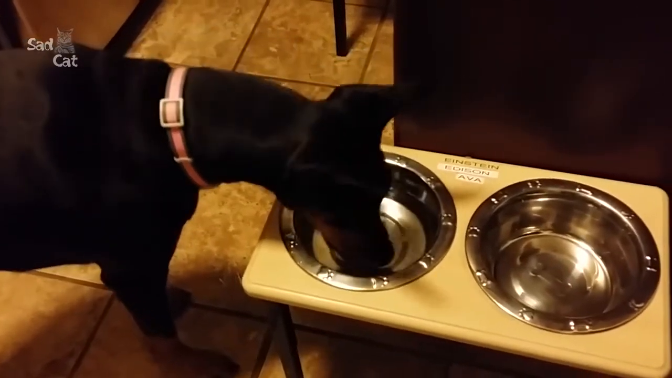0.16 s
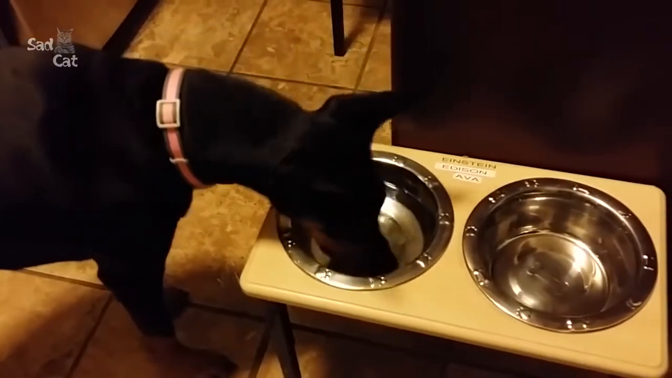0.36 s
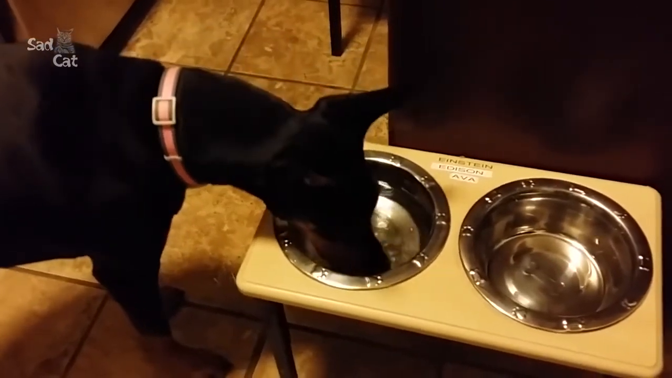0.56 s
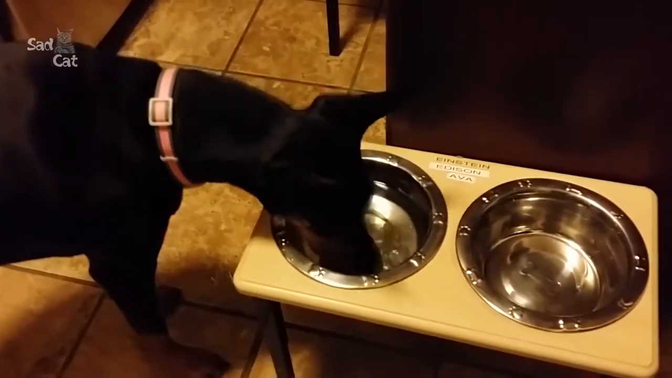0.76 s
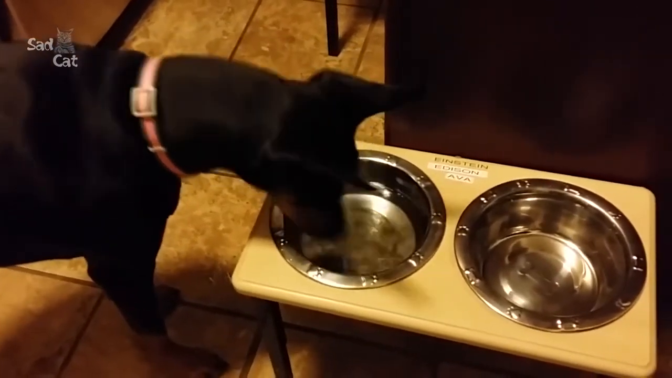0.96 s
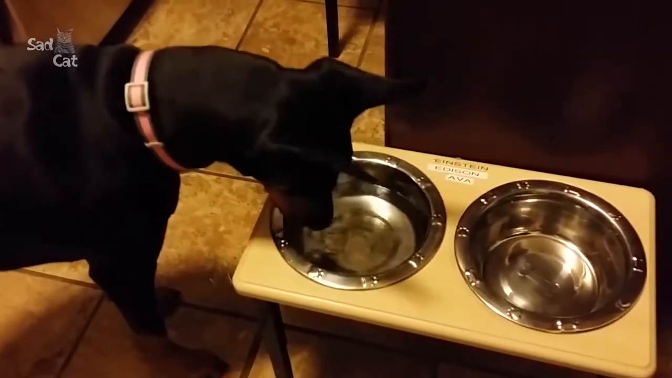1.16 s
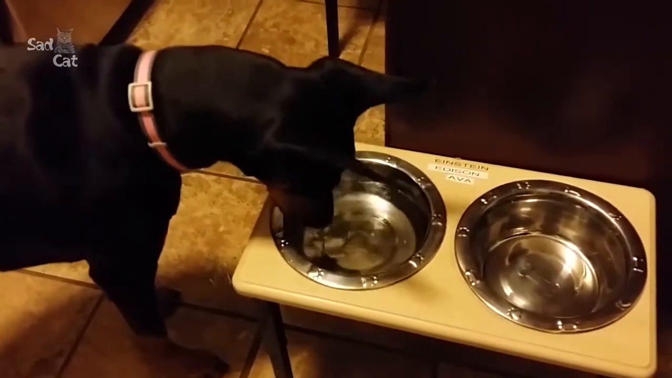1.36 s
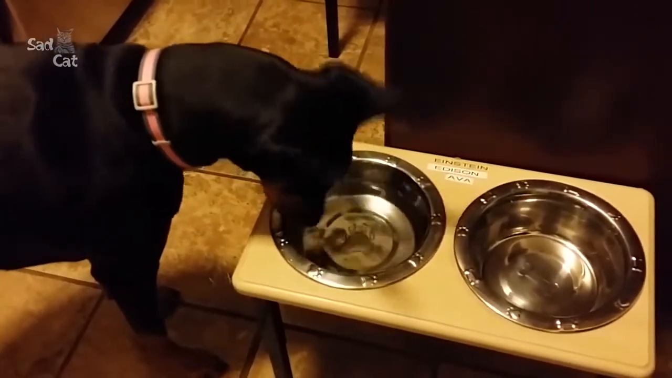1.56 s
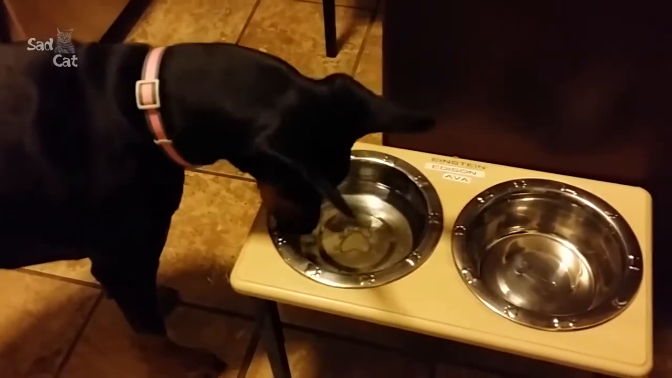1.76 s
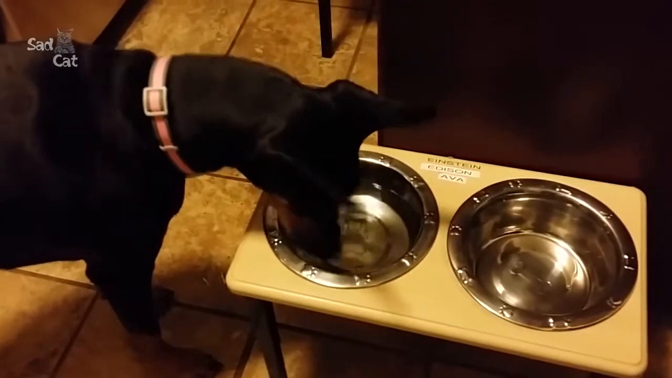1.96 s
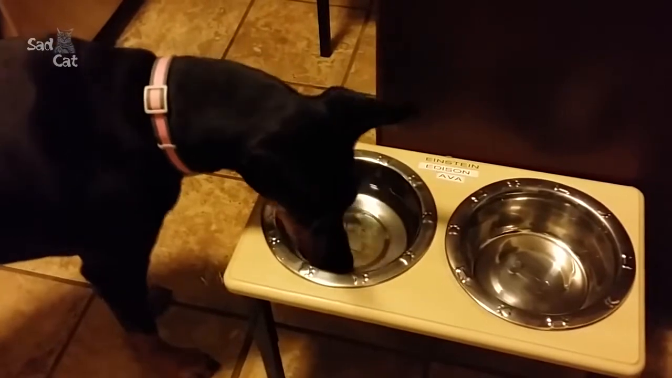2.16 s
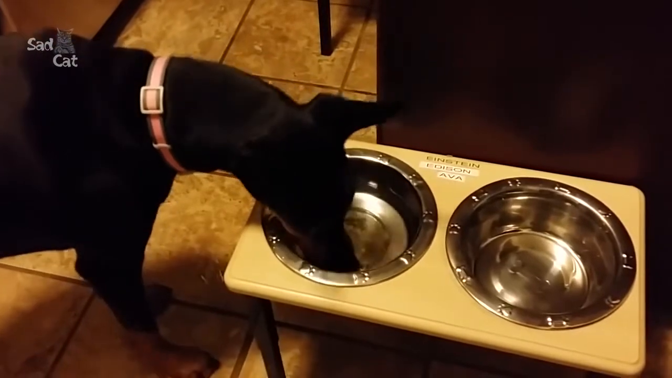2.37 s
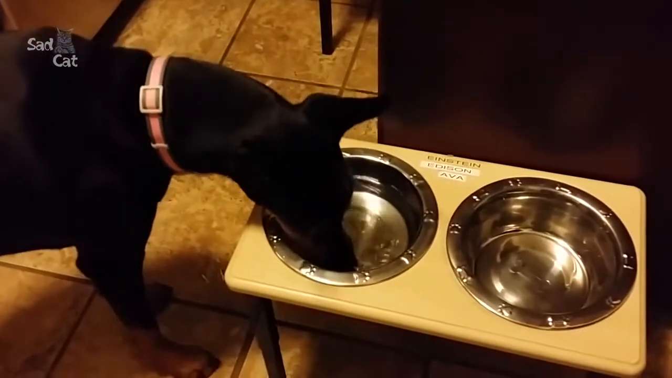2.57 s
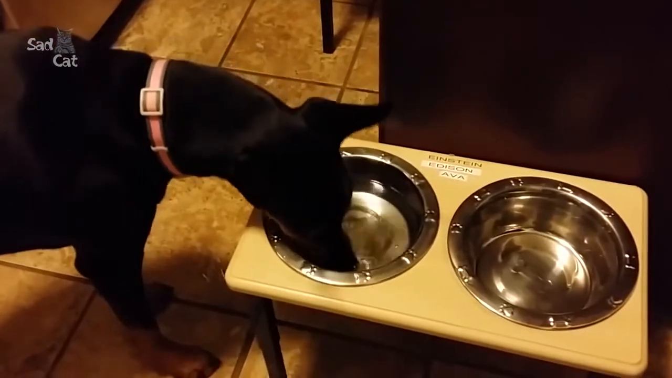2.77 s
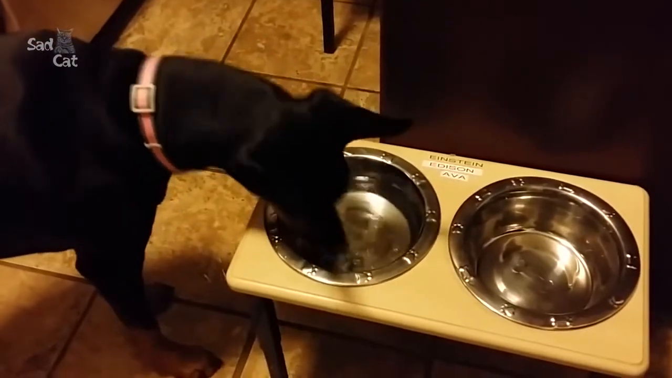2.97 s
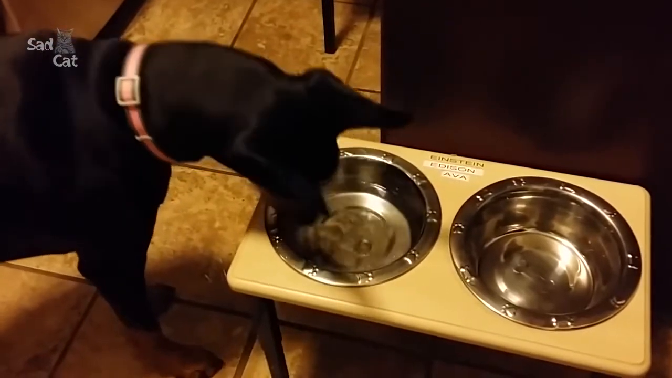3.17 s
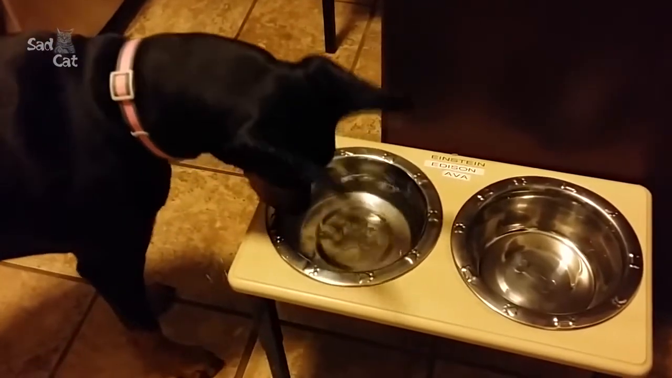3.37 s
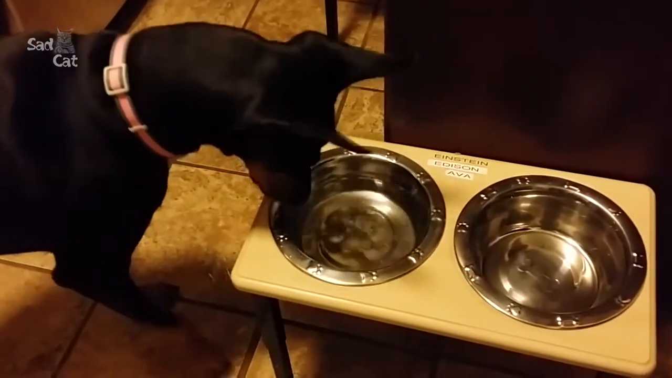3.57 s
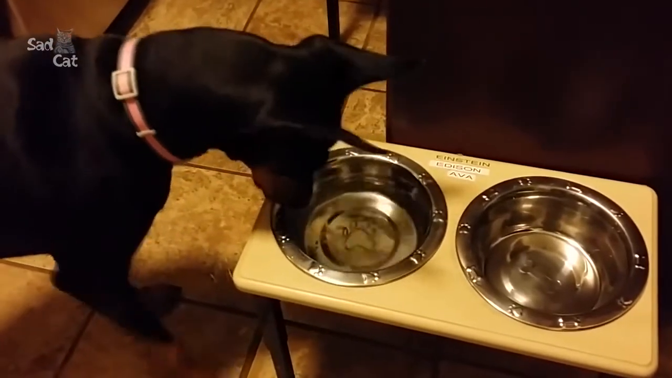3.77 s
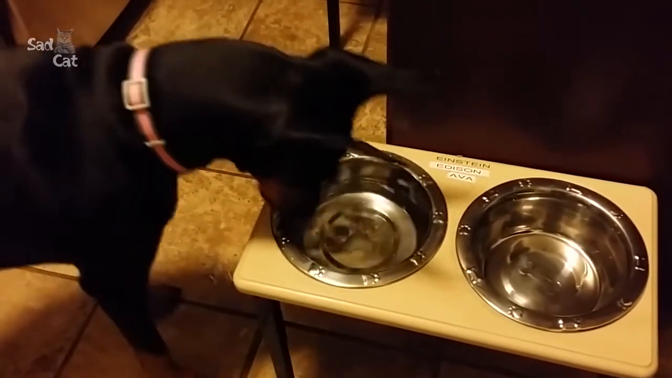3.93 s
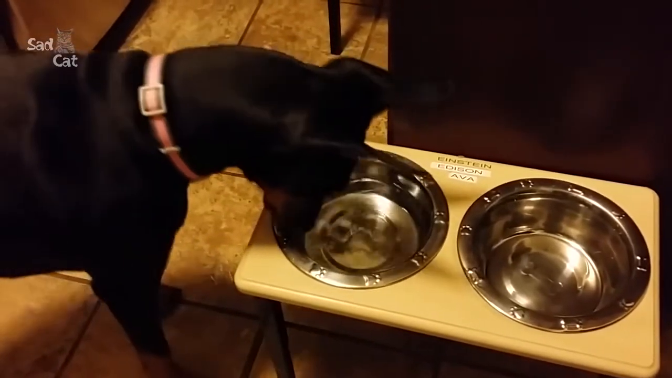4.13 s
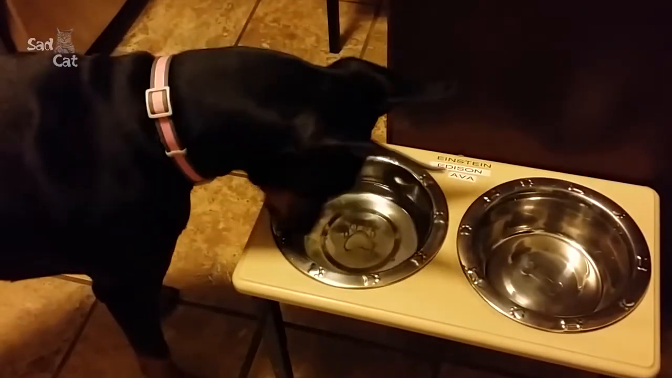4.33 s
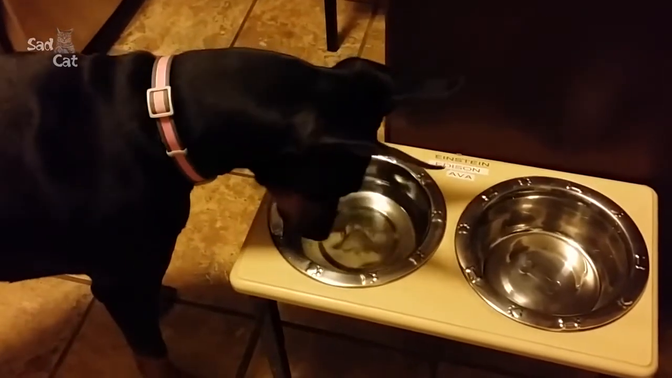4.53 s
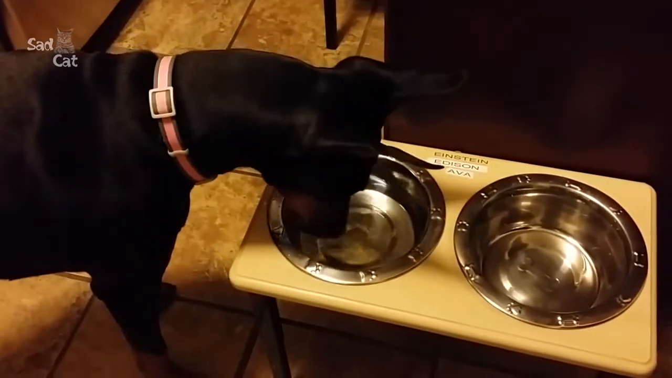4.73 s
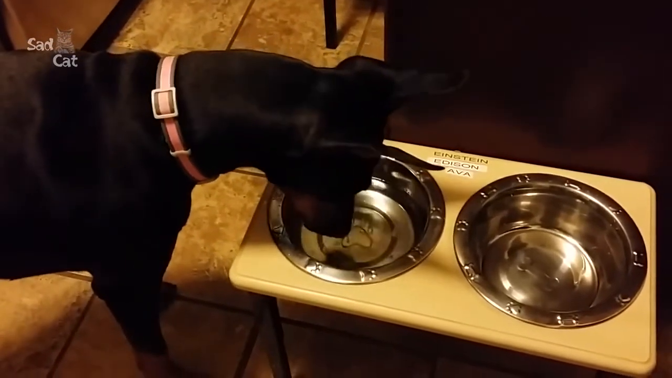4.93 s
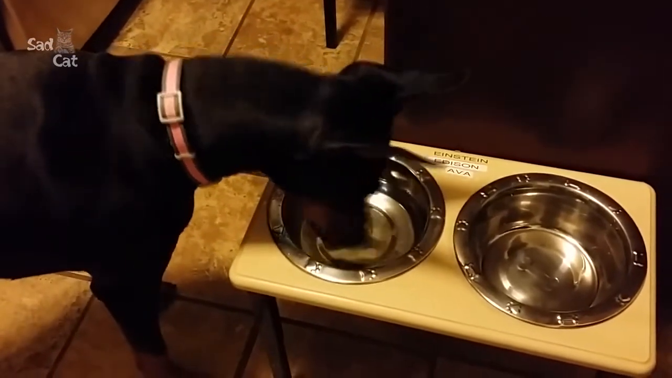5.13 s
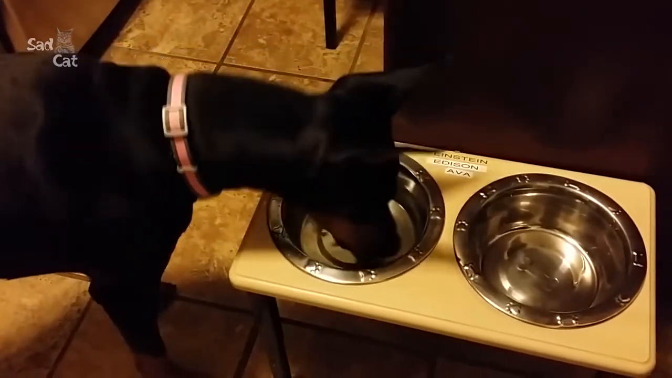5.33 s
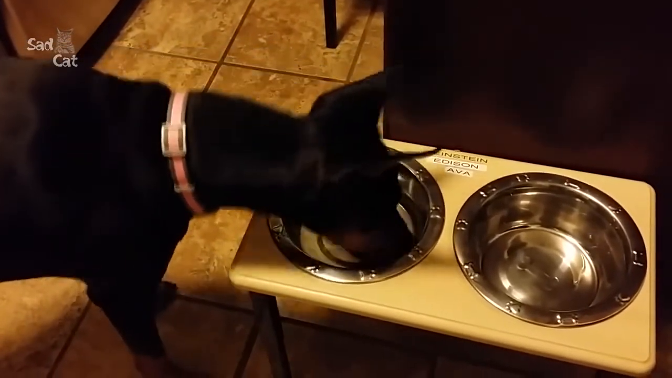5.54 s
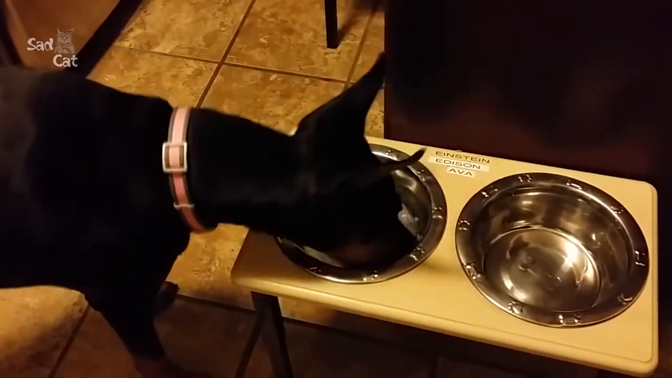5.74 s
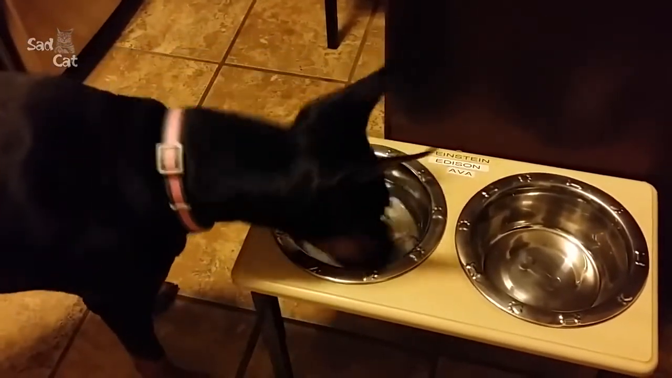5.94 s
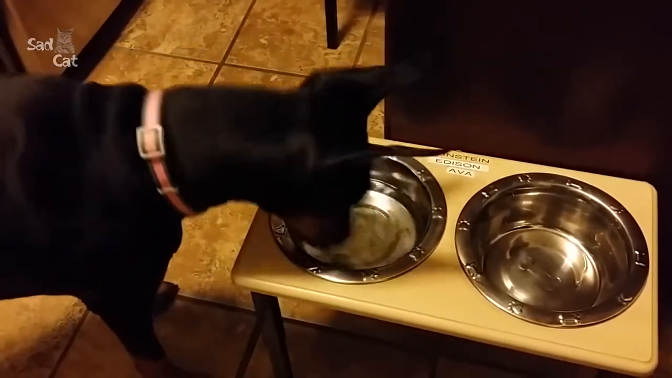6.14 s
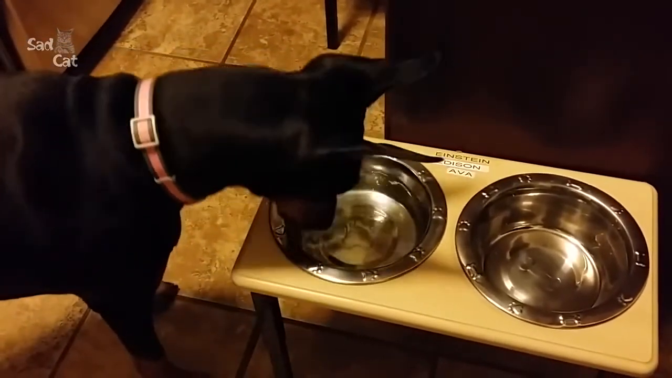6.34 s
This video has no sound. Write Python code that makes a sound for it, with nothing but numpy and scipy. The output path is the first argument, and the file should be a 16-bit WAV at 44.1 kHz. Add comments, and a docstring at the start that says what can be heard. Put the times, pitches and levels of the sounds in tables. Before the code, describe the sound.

A dog laps water from a metal bowl in wet, gulping bouts with pauses between, over faint hum and hiss.

```python
"""A dog laps water from a steel bowl on a stand in a tiled kitchen, over a faint mains hum and hiss.
A first bout begins at once: slaps are pressure pulses, gulps are shrinking cavities that climb in pitch,
bubbles are decaying sines, smacks are bursts of band noise and the stirred water is a swarm of bubbles.
A faint whine swells and sinks up to the second bout, whose end is followed by a soft swish of noise; after
a longer pause comes a short third bout. Bowl modes and a decaying noise tail return the water sounds."""
import sys
import numpy as np
from scipy import signal
from scipy.fft import rfft, irfft, next_fast_len
from scipy.io import wavfile

SR = 44100
rng = np.random.default_rng(int(sys.argv[2]) if len(sys.argv) > 2 else 0)


def waveform_to_disk(signal):
    """Save audio, clipped to [-1, 1], as 16-bit WAV at the path in sys.argv[1]."""
    frames = np.transpose(np.atleast_2d(signal))
    scaled = np.clip(frames, -1, 1) * 32767
    samples = np.round(scaled).astype(np.int16)
    wavfile.write(sys.argv[1], SR, samples)


N = 286628

# In every table the room level is relative to the direct sound.
# Tongue striking the water: (time [s], pulse level [dB], room level [dB])
TONGUE_SLAPS = [(0.1745, -40, -11.5), (0.228, -49, 6), (.451, -47.5, 12), (.529, -42, 3.5),
                (.589, -38, -0.5), (0.686, -39.5, 13), (.710, -34.5, 9), (.764, -26.5, -2.5),
                (2.362, -42, 1.5), (2.523, -37, 1.5), (2.579, -39.5, -2), (2.704, -39, -4), (2.781, -42, 8),
                (2.929, -40.5, 8.5), (3.018, -57, 11), (3.096, -35.5, 8), (5.637, -48.5, 14),
                (5.805, -43.5, 6.5), (5.882, -27.5, -9), (5.942, -38.5, 9.5)]
# Air cavities behind the tongue:
# (time [s], length [ms], first pitch [Hz], last pitch [Hz], level before shaking [dB])
CAVITIES = [(.588, 28.7, 976, 1423, -31), (.711, 25, 630, 650, -40.5), (.766, 34, 635, 734, -36.5),
            (.808, 44, 636, 682, -43), (0.901, 48, 489, 1590, -43.5), (2.294, 75, 546, 692, -53),
            (2.35, 43, 823, 887, -51.5), (2.586, 40.6, 613, 1590, -39), (2.690, 23, 580, 605, -46),
            (2.779, 40, 521, 630, -44), (3.024, 31.5, 510, 582, -34), (3.043, 34, 560.4, 1325, -30),
            (5.882, 39, 677, 807, -36.5)]
# Larger air bubbles, from plops to pings: (time [s], starting pitch [Hz], level [dB], room level [dB])
AIR_BUBBLES = [(.227, 8760, -29.5, -4.5), (.288, 795, -51, 13.5), (0.4386, 1270, -40.5, -8),
               (0.4615, 1290, -36, -6), (.53, 1260, -32.5, -6.5), (.685, 526, -33.5, 10.5),
               (0.71, 1420, -26, -1), (0.7123, 8370, -27.5, 1), (.842, 1380, -32.5, -3),
               (0.892, 1555, -37, 2.5), (.9543, 7890, -36, 20), (1.0348, 7080, -27.5, 4),
               (1.0892, 5170, -16, -12.5), (2.087, 8800, -38, -4), (2.451, 1560, -38, 1),
               (2.672, 985, -36, 4), (2.7203, 6300, -27, 3.5), (2.7217, 8650, -20, -7.5),
               (2.744, 1600, -37.5, 5.5), (2.785, 8500, -36, -3), (2.83, 1177, -33.5, 2.5),
               (2.858, 1260, -33.5, -4.5), (2.933, 8670, -28, 4), (2.94, 1530, -32, 2),
               (3.0164, 5700, -34.5, 10.5), (3.018, 1200, -28.5, -5), (3.0682, 5980, -23, 7),
               (4.842, 8140, -48, -11), (5.806, 1400, -37, -11), (5.823, 1560, -37, 1),
               (5.863, 1190, -41, 5), (5.944, 984, -32, 3), (5.968, 1020, -35, 2), (6.0241, 4080, -38, 5),
               (6.055, 1240, -36.5, 3), (6.0888, 9000, -36.5, -3), (6.125, 6540, -32, 8),
               (6.1245, 8770, -21, 4.5)]
# Wet smacks of lips and tongue:
# (time [s], band centre [Hz], band width [octaves], decay [ms], rms level before the decay [dB])
WET_SMACKS = [(0.1929, 7160, 1.06, 0.29, -31.5), (0.29, 6440, 1.7, 3.2, -47.5),
              (.462, 3580, .75, 0.97, -41.5), (.612, 2060, 0.24, 37, -59), (0.7101, 3500, 2.2, 1.44, -29.5),
              (.892, 2800, 0.32, 1.4, -42.5), (0.9547, 8100, .25, 1.9, -34), (2.342, 1960, 0.11, 12, -54),
              (2.344, 3450, 0.1, 4, -49.5), (2.352, 7240, 0.43, 28, -57), (2.357, 616, 0.37, 26, -51),
              (2.455, 8300, 0.46, 21, -53), (2.4691, 3180, 0.47, 5.3, -34.5), (2.471, 1500, 0.11, 42, -50),
              (2.825, 3170, 0.088, 12, -45), (2.862, 2650, 0.056, 24, -44), (3.0682, 6720, .19, 3.7, -33.5),
              (3.182, 7160, 4.3, 2.7, -44.5), (5.633, 1990, .27, 16.6, -50), (5.637, 6000, .8, 42, -60),
              (6.122, 1800, 0.37, 22, -46), (6.123, 8300, 0.27, 13, -39)]
# Bouts of lapping: (start [s], end [s], stirring level at start [dB], stirring level at end [dB])
LAPPING_BOUTS = [(0.148, 1.004, -68, -55), (2.395, 3.107, -56, -54), (5.769, 6.132, -64.5, -58)]
# Bubble spectrum of the sloshing water: (frequency [Hz], level [dB])
SLOSH_SPECTRUM = [(90, -4), (200, -7.5), (300, -3), (650, -10), (1200, -1), (1800, -1), (3000, -10.5)]
# Bubble spectrum of the stray plops: (frequency [Hz], level [dB])
PLOP_SPECTRUM = [(400, -2.5), (1100, -1), (1800, -4)]
# Bubble spectrum of the fine spray: (frequency [Hz], level [dB])
SPRAY_SPECTRUM = [(2200, -10.5), (4000, -7.5), (7000, 1), (9000, -6), (11000, -2), (14000, -15.5)]
# Modes of the bowl and its stand: (frequency [Hz], 60 dB decay time [s], gain at resonance [dB])
BOWL_MODES = [(63, 0.4, 11), (288, 0.2, 12), (407, 0.14, 3), (522, 0.38, -7), (560, 0.1, -14),
              (660, 0.092, -19), (1070, 0.12, 2.5), (1207, .25, -6), (1700, 0.24, -19)]
# Decay of the tiled room, before the early emphasis: (frequency [Hz], 60 dB decay time [s])
ROOM_DECAY = [(150, 0.44), (500, 0.39), (1400, 0.37), (3700, 0.46), (9700, 0.23)]
# Response difference of the two ports: (frequency [Hz], left minus right [dB])
PORT_DIFFERENCE = [(100, -3), (500, -3.5), (1200, -4), (3000, -1), (5400, -2), (6900, 4.5), (7700, 1.5),
                   (8400, -12), (9300, -7.5), (11000, 0)]
# Faint sinking whine: (time [s], pitch [Hz], level [dB])
WHINE_COURSE = [(0, 700, -85), (1.3, 500, -82.5), (2.25, 410, -76), (3, 357, -115)]
# Spectral shape of the background noise: (frequency [Hz], relative level per Hz [dB])
BACKGROUND_SPECTRUM = [(15, -42), (25, -7.5), (90, -4.5), (121, -1), (202, -12.5), (237, -1.5),
                       (264, -10.5), (344, -9), (1120, -17.5), (5420, -22), (6900, -14.5), (13800, -26.5),
                       (15000, -34.5)]
# Likeness of the background at the two ports: (frequency [Hz], left-right correlation [0 to 1])
BACKGROUND_LIKENESS = [(60, 0.22), (240, 0.71), (950, 0.033), (3770, .01)]
# Mains hum partials, before a common trim: (frequency [Hz], level [dB])
HUM_PARTIALS = [(118.4, -91), (236.9, -88)]

# A cavity that climbs over an octave closes late and is loudest late; others glide evenly, loudest early.
CLOSING_POWER = 2.1
CREST_OPEN, CREST_CLOSED = 0.12, 0.95  # shares of the length
GULP_ROOM_DB, SMACK_ROOM_DB = -3, 4
# Small bubbles die sooner: time scale at 1 kHz, and the power of pitch by which it shortens.
RING_SCALE_MS, RING_POWER = 2.25, 0.5
# The water stirs up quickly and settles when the lapping stops.
STIR_S, SETTLE_DB_PER_S = 0.04, 104.5
# Weights of slosh and spray on the stirring.
SLOSH_DB, SPRAY_DB = -4.5, -6.5
# Droplets from each smack: level against it before the spray weight, and decay time.
DROPLETS_DB, DROPLETS_S = -29.5, 0.0393
# Stray plops: weight on the stirring, mean rate, and decay in cycles.
PLOPS_DB, PLOPS_PER_S, PLOP_CYCLES = -11.5, 54, 5
# Swish: middle, half length, level and band centre.
SWISH_S, SWISH_HALF_S, SWISH_DB, SWISH_HZ = 3.625, 0.063, -70.5, 6000
BACKGROUND_DB = -69
EDGE_HZ = 14750  # upper band limit


def amp(db):
    """Decibel law: 20 dB is a tenfold amplitude."""
    return 10 ** (np.asarray(db) / 20)


def unit(x):
    """Normalisation to unit rms."""
    return x / np.sqrt(np.mean(x ** 2) + 1e-20)


def read(points, hz):
    """Interpolation along a logarithmic frequency axis."""
    f, value = np.transpose(points)
    return np.interp(np.log(hz + 1), np.log(f + 1), value)


def seconds(length):
    """Sampled time axis, in seconds."""
    return np.arange(int(length * SR)) / SR


def colour(x, gain_db):
    """Linear filtering: the spectrum is multiplied by a gain given in dB over Hz."""
    count = x.shape[-1]
    size = next_fast_len(count + SR // 10)
    gain = amp(gain_db(np.fft.rfftfreq(size, 1 / SR)))
    return irfft(rfft(x, size) * gain, size)[..., :count]


def add(bus, s, sound, room_db):
    """Superposition: a sound joins the direct path (row 0) and the room feed (row 1)."""
    part = bus[:, round(s * SR):][:, :len(sound)]
    part += np.outer([1, amp(room_db)], sound[:part.shape[1]])


def slap(push_ms, low_hz):
    """Impact radiation: a push of pressure and its rebound; so small a source radiates little bass."""
    u = seconds(0.03) * 1000 / push_ms
    pulse = 2 * u * (2 - u) * np.exp(-u)
    return signal.lfilter(*signal.butter(1, low_hz, "high", fs=SR), pulse)


def gulp(length_ms, first_hz, last_hz, rough=0.26, waver=0.03):
    """Cavity resonance: a shrinking air space rings ever higher; trembling walls shake level and pitch."""
    u = np.linspace(0, 1, int(length_ms * SR / 1000))
    noise = rng.standard_normal((2, SR // 5))
    tremble = unit(colour(noise, lambda f: -20 * np.log10(1 + (f / 250) ** 2)))
    shake, wobble = tremble[:, :len(u)]
    closes = last_hz > 2 * first_hz
    power, crest = (CLOSING_POWER, CREST_CLOSED) if closes else (1, CREST_OPEN)
    hz = first_hz * (last_hz / first_hz) ** (u ** power) * (1 + waver * wobble)
    swell = np.sin(np.pi * np.interp(u, [0, crest, 1], [0, 0.5, 1]))
    return swell * (1 + rough * shake) * np.sin(2 * np.pi * np.cumsum(hz) / SR)


def bubble(hz, decay_ms, rise=0.061, hold=1.76):
    """Bubble resonance: it pinches off within a cycle and rings; large ones rise most near the surface."""
    decay = decay_ms / 1000
    t = seconds(6 * decay)
    climb = rise * np.sqrt(1500 / hz) * t / decay
    turns = hz * t * (1 + climb / 2)
    pinch_off = 1 - np.exp(-turns ** 2 * 2)
    fade = np.exp(-(t / decay / 1.114) ** hold)
    return np.sin(2 * np.pi * turns) * pinch_off * fade


def smack(hz, octaves, decay_ms, crackle_db=4):
    """Film rupture: tearing saliva gives a crackling noise burst in one band, dull at the very top."""
    t = seconds(0.15)
    crackle = rng.standard_normal(len(t)) * amp(crackle_db * rng.standard_normal(len(t)))

    def band_db(f):
        distance = np.log2((f + 1) / hz) / octaves
        return -20 * np.log10((1 + distance ** 2 / 2) * (1 + (f / 11000) ** 6))

    return unit(colour(crackle, band_db)) * np.exp(-t * 1000 / decay_ms)


def swarm(spectrum, per_s, cycles, spread_db, count=30):
    """Incoherent summation: many short-lived bubbles of graded pitch, a few much louder than the rest."""
    out = np.zeros(N + SR)
    for hz in np.geomspace(spectrum[0][0], spectrum[-1][0], count):
        when, size, chance = rng.random((3, N // 200))
        born = chance < per_s * N / SR / count / len(chance)
        ring = bubble(hz, 1000 * cycles / hz)
        ring *= amp(read(spectrum, hz)) / np.linalg.norm(ring)
        at = (when[born, None] * N).astype(int) + np.arange(len(ring))
        rings = np.outer(amp(spread_db * size[born] ** 2), ring)
        out += np.bincount(at.ravel(), rings.ravel(), len(out))
    return unit(out[:N])


def churn():
    """Build-up and decay: levels of slosh and spray follow each bout; spray also jumps at each smack."""
    t, stir = np.arange(N) / SR, np.zeros(N)
    for start, end, first_db, last_db in LAPPING_BOUTS:
        level_db = np.interp(t, [start, end], [first_db, last_db])
        level_db -= SETTLE_DB_PER_S * np.maximum(t - end, 0)
        stir += np.clip((t - start) / STIR_S, 0, 1) * amp(level_db)
    droplets = np.zeros(N)
    for s, *_, db in WET_SMACKS:
        droplets += amp(db + DROPLETS_DB) * (t >= s) * np.exp(-abs(t - s) / DROPLETS_S)
    return stir, stir + droplets


def stirred_water():
    """Amplitude modulation: steady bubble swarms take on the levels of the churning water."""
    slosh_level, spray_level = churn()
    slosh = amp(SLOSH_DB) * swarm(SLOSH_SPECTRUM, per_s=240, cycles=1.87, spread_db=6.0)
    slosh += amp(PLOPS_DB) * swarm(PLOP_SPECTRUM, PLOPS_PER_S, PLOP_CYCLES, spread_db=7.5)
    spray = amp(SPRAY_DB) * swarm(SPRAY_SPECTRUM, per_s=800, cycles=1.3, spread_db=17)
    return slosh_level * slosh + spray_level * spray


def swish():
    """Shaped noise: a faint, wide hiss swells and fades as the dog shifts."""
    noise = rng.standard_normal(N)
    hiss = unit(colour(noise, lambda f: -10 * np.log10(1 + np.log2((f + 1) / SWISH_HZ) ** 2)))
    return amp(SWISH_DB) * hiss * np.exp(-((np.arange(N) / SR - SWISH_S) / SWISH_HALF_S) ** 2)


def bowl(x):
    """Modal resonance: the water-damped modes of the bowl ring along with the sound."""
    t = seconds(0.5)
    ring = np.zeros(len(t))
    for hz, t60, db in BOWL_MODES:
        peak_norm = 2 * np.log(1000) / t60 / SR  # brings the gain at resonance to about 1
        ring += amp(db - 60 * t / t60) * np.cos(2 * np.pi * hz * t) * peak_norm
    return signal.oaconvolve(x, ring)[:N]


def kitchen(x, near_db=4, near_s=0.066, apart_hz=1700):
    """Reverberation: dense early echoes from bowl and cabinet, then tiles; the ports share mostly bass."""
    t = seconds(0.7)
    echoes = rng.choice([-1., 1.], (2, len(t))) * (rng.random((2, len(t))) < 0.15)
    hz, at, z = signal.stft(echoes, SR, nperseg=256)
    same = 0.74 * np.exp(-(hz / apart_hz) ** 2)[:, None]
    z[1] = same * z[0] + np.sqrt(1 - same ** 2) * z[1]
    fade = amp(-60 * at / read(ROOM_DECAY, hz)[:, None])
    tail = signal.istft(z * fade, SR, nperseg=256)[1][:, :len(t)]
    onset = np.clip(t / 0.0007 - 0.5, 0, 1)
    tail *= onset * (1 + amp(near_db) * np.exp(-t / near_s))
    tail /= np.linalg.norm(tail, axis=1, keepdims=True)
    return signal.fftconvolve(x[None], tail, axes=1)[:, :N]


def whine(flutter_hz=12):
    """Modulated tone: slow noise flutters one thin tone that sinks in pitch and fades in and out."""
    s, hz, db = np.transpose(WHINE_COURSE)
    t = np.arange(N) / SR
    noise = rng.standard_normal(N)
    flutter = unit(colour(noise, lambda f: -20 * np.log10(1 + (f / flutter_hz) ** 2)))
    tone = np.sqrt(2) * np.sin(2 * np.pi * np.cumsum(np.interp(t, s, hz)) / SR)
    return amp(np.interp(t, s, db)) * flutter * tone


def quiet(hum_db=-1):
    """Stationary background: partly correlated room rumble and microphone hiss, with steady mains hum."""
    a, b = rng.standard_normal((2, N))

    def same(f):
        return np.clip(read(BACKGROUND_LIKENESS, f), 0.01, 0.99)

    right = colour(a, lambda f: 20 * np.log10(same(f)))
    right += colour(b, lambda f: 10 * np.log10(1 - same(f) ** 2))
    air = unit(colour(np.array([a, right]), lambda f: read(BACKGROUND_SPECTRUM, f)))
    t, hum = np.arange(N) / SR, np.zeros(N)
    for hz, db in HUM_PARTIALS:
        hum += amp(db + hum_db) * np.sqrt(2) * np.sin(2 * np.pi * hz * t)
    return amp(BACKGROUND_DB) * air + hum


def scene():
    """Superposition of paths: water and swish arrive directly, through the bowl and through the room."""
    bus = np.zeros((2, N))
    for s, db, room_db in TONGUE_SLAPS:
        add(bus, s, amp(db) * slap(push_ms=0.4, low_hz=272), room_db)
    for s, length_ms, first_hz, last_hz, db in CAVITIES:
        add(bus, s, amp(db) * gulp(length_ms, first_hz, last_hz), GULP_ROOM_DB)
    for s, hz, db, room_db in AIR_BUBBLES:
        decay_ms = RING_SCALE_MS * (1000 / hz) ** RING_POWER
        add(bus, s, amp(db) * bubble(hz, decay_ms), room_db)
    for s, hz, octaves, decay_ms, db in WET_SMACKS:
        add(bus, s, amp(db) * smack(hz, octaves, decay_ms), SMACK_ROOM_DB)
    add(bus, 0, stirred_water(), room_db=4.5)
    add(bus, 0, swish(), room_db=4)
    direct, room_feed = bus
    near = direct + bowl(room_feed)
    # the near sound reaches the left port six samples before the right
    ports = np.array([near, np.roll(near, 6)]) + kitchen(room_feed)
    # each port has its own resonance
    ports = colour(ports, lambda f: np.outer([0.5, -0.5], read(PORT_DIFFERENCE, f)))
    return ports + quiet() + whine()


def record(dry):
    """Band limitation: a gentle high-pass removes the lowest bass, a steep low-pass the top treble."""
    dry = signal.lfilter(*signal.butter(2, 42, "high", fs=SR), dry)
    low_pass = signal.firwin(255, EDGE_HZ, window=("kaiser", 8), fs=SR)
    return signal.oaconvolve(dry, low_pass[None], "same")


dry = scene()
out = record(dry)
waveform_to_disk(out)
```